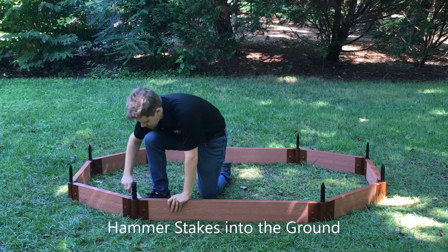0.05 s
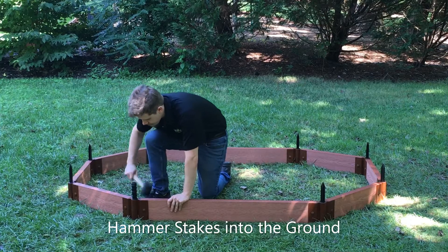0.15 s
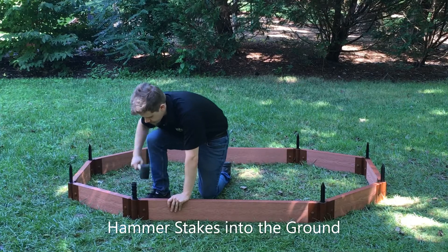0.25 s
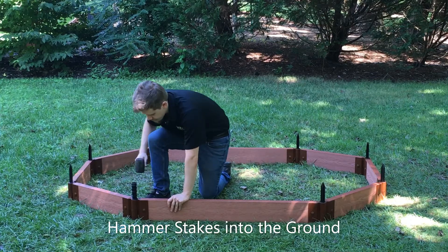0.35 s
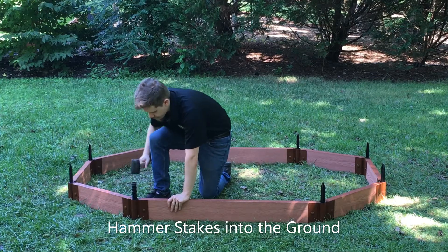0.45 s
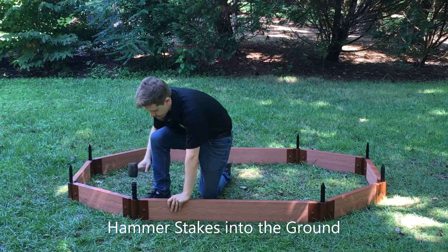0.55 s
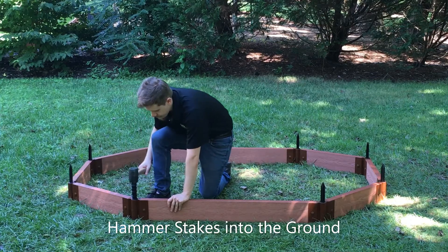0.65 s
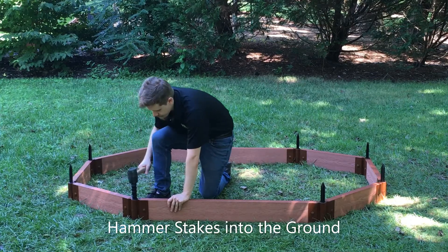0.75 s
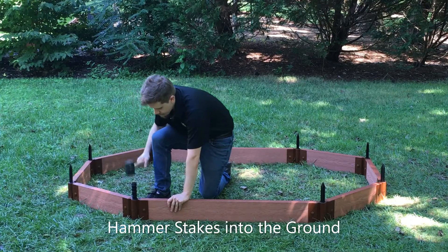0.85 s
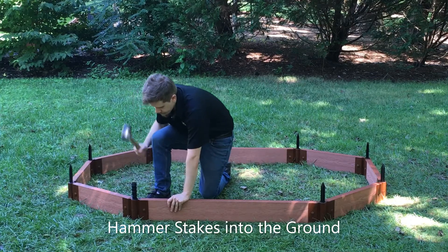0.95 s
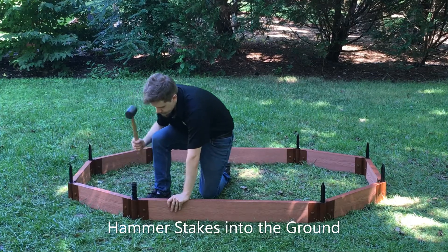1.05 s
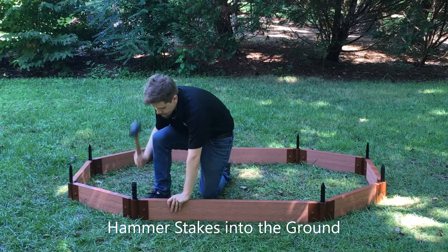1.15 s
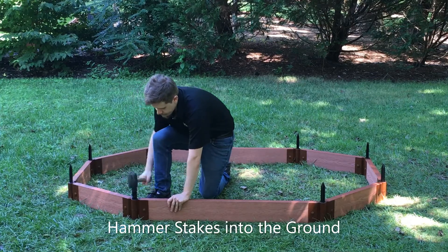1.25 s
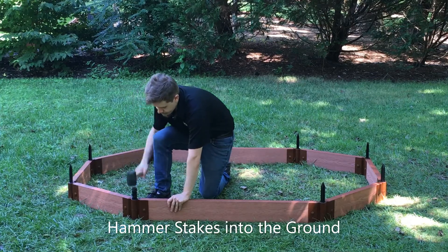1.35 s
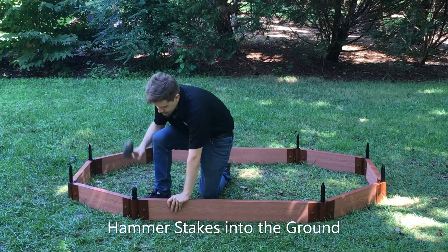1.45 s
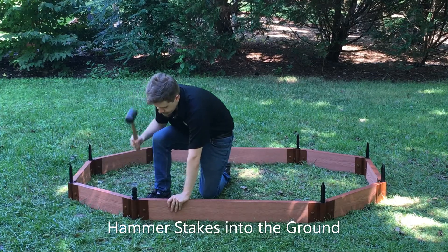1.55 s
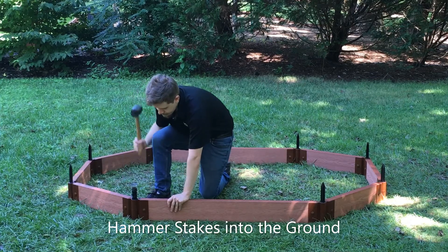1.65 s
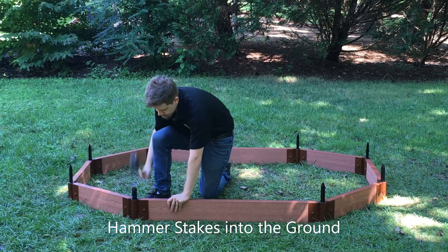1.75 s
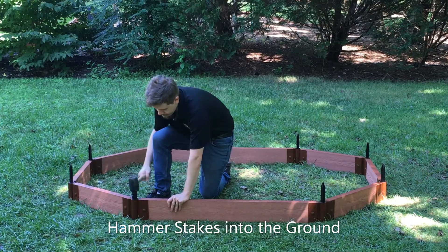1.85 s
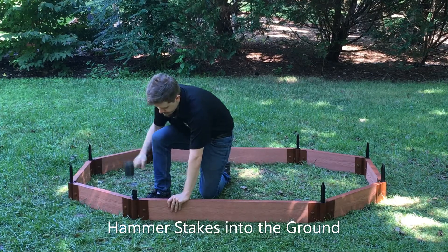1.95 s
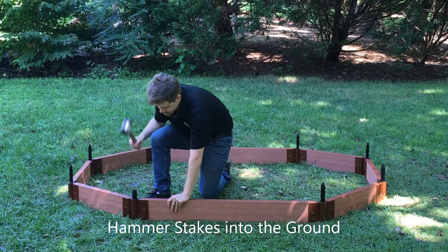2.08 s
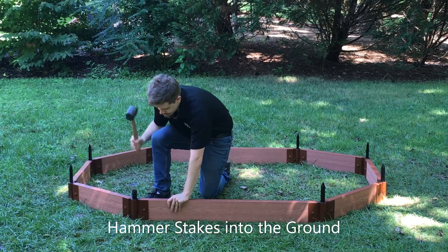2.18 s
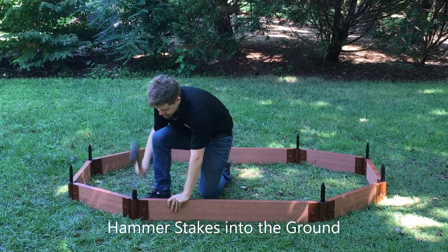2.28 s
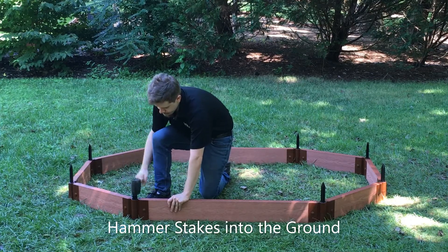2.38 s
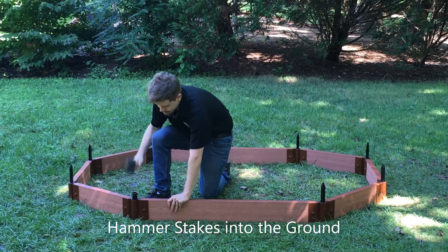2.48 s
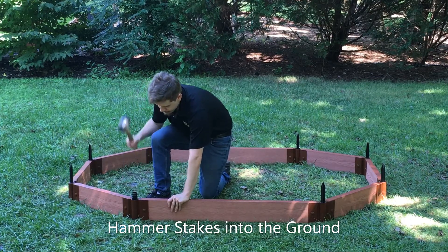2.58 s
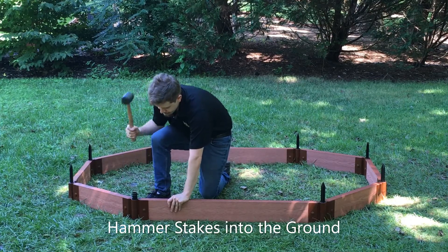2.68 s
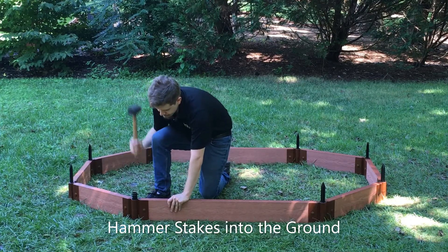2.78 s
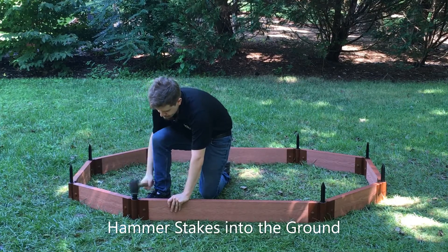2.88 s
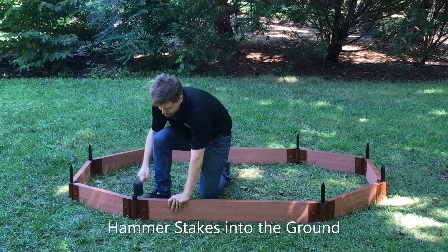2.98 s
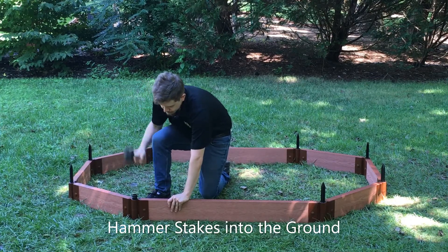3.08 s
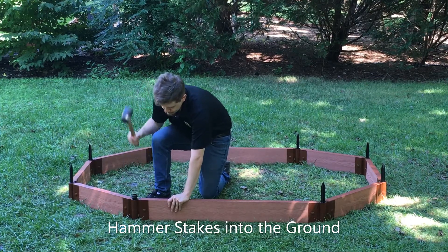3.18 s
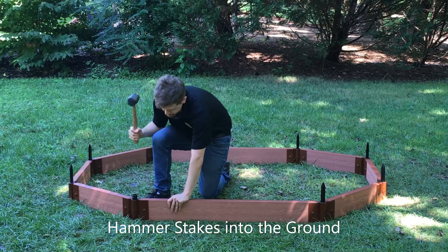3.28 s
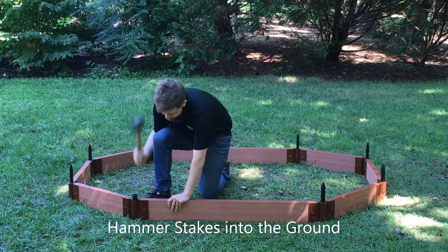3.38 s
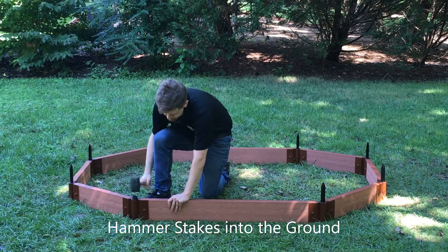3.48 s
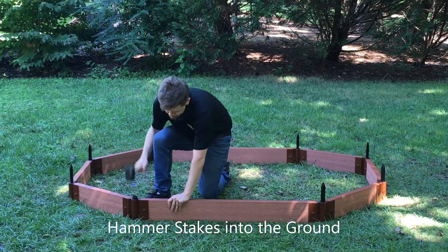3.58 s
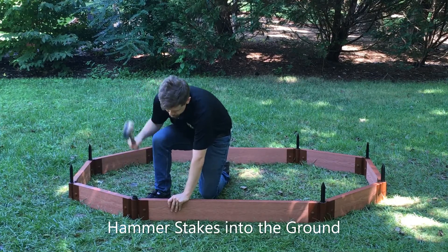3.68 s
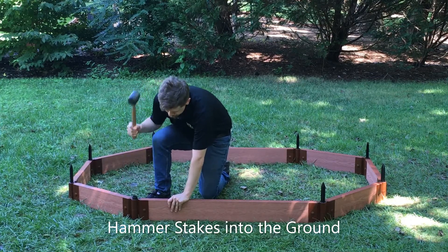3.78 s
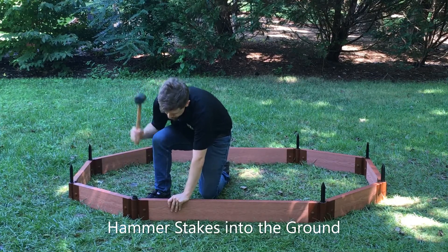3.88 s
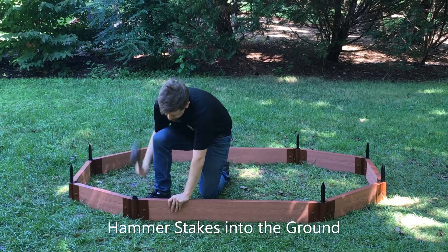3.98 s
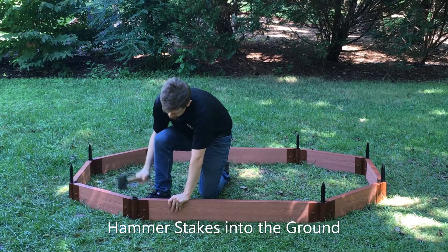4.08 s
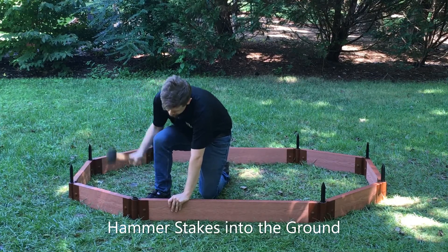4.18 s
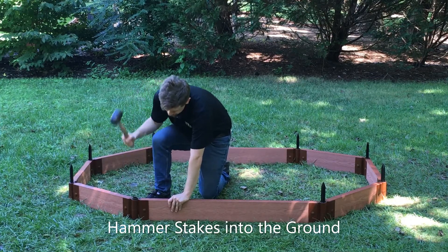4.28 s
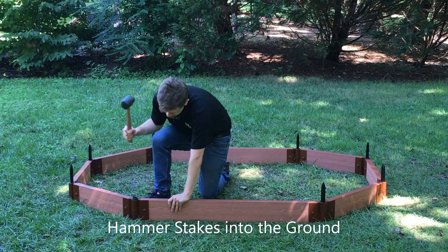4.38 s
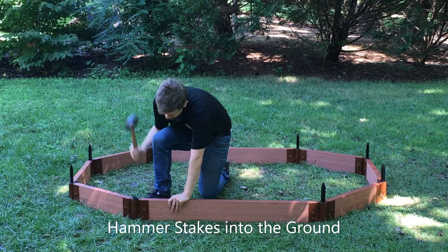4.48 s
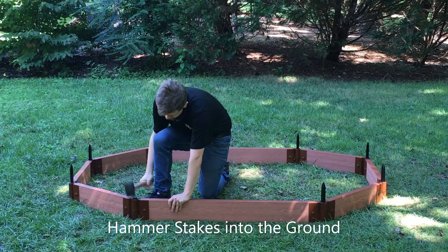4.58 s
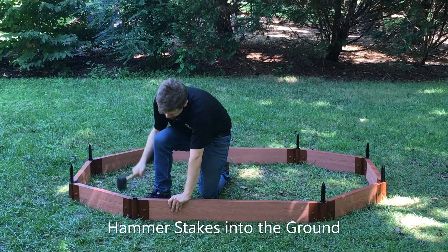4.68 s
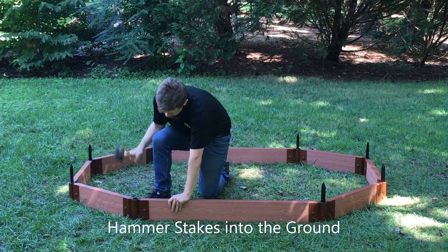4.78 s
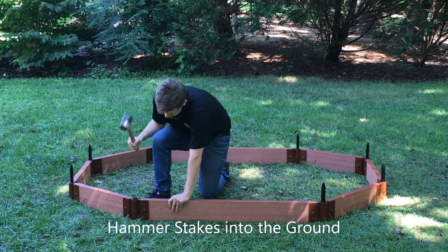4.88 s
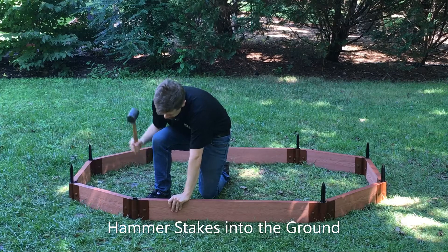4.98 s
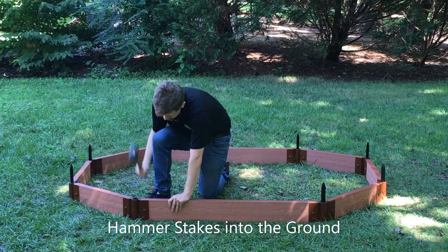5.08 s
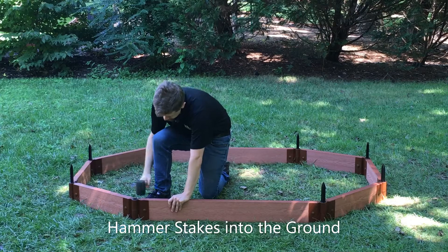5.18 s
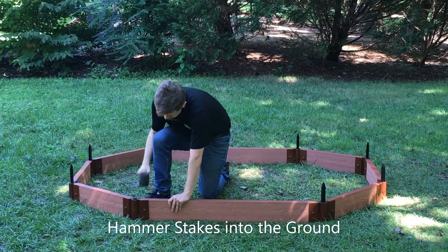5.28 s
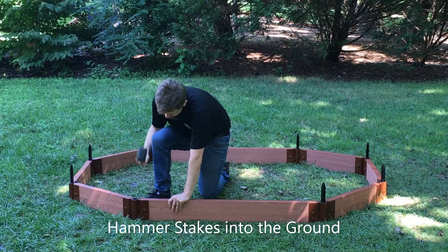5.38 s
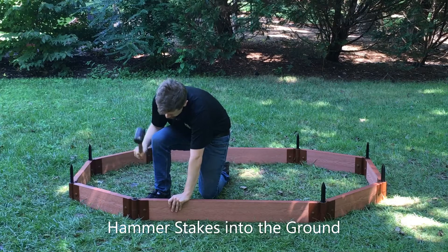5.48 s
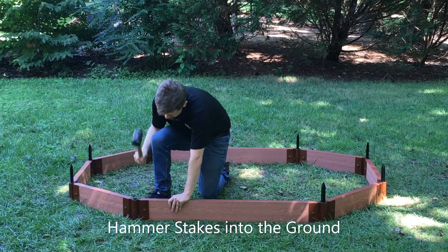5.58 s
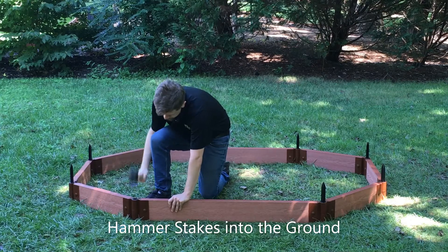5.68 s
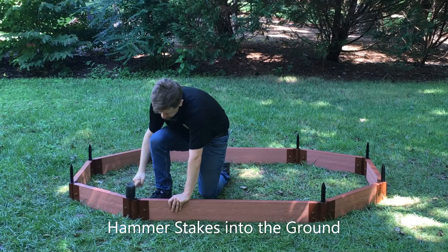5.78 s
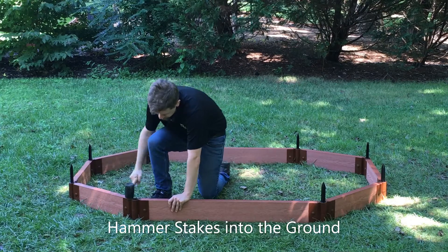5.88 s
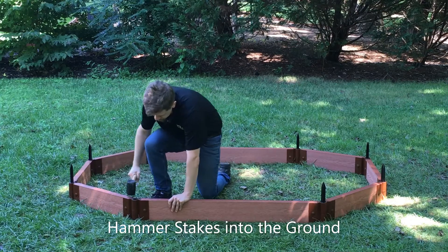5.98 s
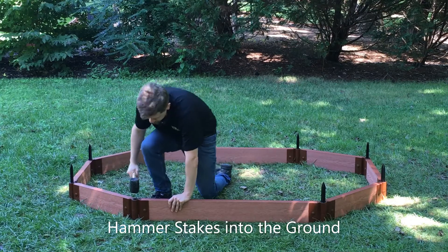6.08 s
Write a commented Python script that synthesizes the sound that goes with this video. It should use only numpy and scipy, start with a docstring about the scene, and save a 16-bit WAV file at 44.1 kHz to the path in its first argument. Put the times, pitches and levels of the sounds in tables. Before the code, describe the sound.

Near silence outdoors with a faint low rumble and thin insect buzz, then a barely audible dull tap. Strong mallet blows follow at a steady pace, some bright and rattly, others duller, hollow and thuddy, all short and dry with a quick leafy echo. The mallet head occasionally bounces lightly on the stake. Tiny ticks and rustles sit between hits, heard by a phone microphone a few metres away.

```python
"""On a lawn, with a phone a few metres off, a mallet drives a plastic stake through the corner of a low board frame.
A rough push rings the boards as decaying sines; the stake chatters in its sleeve as jagged noise and the soil thuds.
Now and then the head drops back on the stake. Shrubs return each blow as fading noise.
Behind lie faint rustles and ticks, an insect band, far traffic and wind, all shaped noise.
The loudest blows overload the phone's microphone."""
import sys
import numpy as np
from scipy import signal
from scipy.fft import rfft, irfft
from scipy.io import wavfile
from scipy.ndimage import uniform_filter1d

SR = 44100
rng = np.random.default_rng(int(sys.argv[2]) if len(sys.argv) > 2 else 0)


def unload_wav(signal):
    """Save mono or channel-first audio to the path in sys.argv[1] as 16-bit WAV at rate SR, clipped to [-1, 1]."""
    wavfile.write(
        sys.argv[1],
        SR,
        np.round(np.clip(np.atleast_2d(signal).T, -1, 1) * 32767).astype(np.int16),
    )


N = 270685
T = np.arange(N) / SR

# mallet on stake; knock rms over its first 10 ms, chatter, thud and hollow relative to the knock:
# (time [s], knock [dB], chatter [dB], thud [dB], hollow ring [dB], change of upper modes [dB], slide [ms])
BLOWS = [(0.7094, -50.5, -24.5, 1, -3, -24, 20), (1.3009, -26, -1.5, -20.5, -4, -10, 6.55),
         (1.8622, -22.5, 3.5, -15, -10, 2.5, 4.6), (2.409, -24.5, 3.5, -9.5, -3, -1, 4.7),
         (2.969, -29, 1, -5, -8, 6.5, 3.9), (3.545, -31, -8, -1, 2, 0, 4.84),
         (4.1138, -26, -4, -5, -20.5, 3, 3.1), (4.668, -32, -4.5, 2, 5, -0.5, 10.4),
         (5.224, -25, -5.5, -5.5, -12.5, -1.5, 5.9), (5.8065, -22.5, 1.5, -10.5, -13, 3.5, 5.6)]
# the head drops back on the stake: (time [s], knock level [dB])
REBOUNDS = [(0.766, -62.5), (2.473, -55), (5.885, -43.5)]
# modes of boards and stake, before each blow's own shifts: (frequency [Hz], level [dB], t60 [s])
FRAME_MODES = [(232, -10.5, 0.033), (347, -10, 0.052), (422, -11.5, 0.065), (490.4, -11, 0.081),
               (613, 0, .035), (773, -14, 0.042), (904, 2.5, 0.019), (1001, -13, .06), (1072, -18.5, 0.088),
               (1320, -19, 0.087), (1484, -10.5, 0.018), (1496, -21.5, 0.033), (1574, -14, .05),
               (1763, -21.5, .06), (2220, -19.5, 0.035), (2320, -21, 0.028), (2430, -14.5, .03),
               (2884, -17.5, 0.044)]
# spectrum of the stake in its sleeve, before each blow's tilt: (frequency [Hz], density [dB per Hz])
CHATTER_SPECTRUM = [(710, -31.5), (1200, -4), (1870, -4.5), (2830, -3.5), (5530, -6.5), (6510, -8),
                    (8910, -11), (14500, -17.5), (16000, -34.5)]
# return from near foliage, then from far, before the blow's own echo and chatter levels:
# (frequency [Hz], near level [dB], near t60 [s], far level [dB], far t60 [s])
SHRUB_BANDS = [(287, -25, 0.2, -43, 0.41), (550, -21.5, 0.18, -38, 0.41), (950, -18.5, 0.18, -35.5, 0.33),
               (1440, -20, 0.075, -38, 0.3), (2110, -22, 0.05, -38.5, 0.44), (3360, -19.5, .07, -34, 0.4),
               (5060, -17, 0.056, -35, 0.37), (7500, -23, 0.084, -36, 0.15), (10800, -26, .08, -47, 0.31),
               (13300, -30.5, .08, -48.5, .2)]
# soft rustles of sleeve and grass: (centre time [s], length [s], level [dB], frequency [Hz])
RUSTLES = [(.13, 0.069, -88, 6040), (1.02, 0.19, -83.5, 4300), (5.1, 0.29, -87.5, 4400)]
# faint ticks: (time [s], level [dB])
TICKS = [(1.67, -79), (2.2194, -73), (2.6308, -70), (3.9094, -82), (6.11, -85.5)]
# spectrum of far traffic and wind: (frequency [Hz], density [dB per Hz])
GARDEN_SPECTRUM = [(15, -9), (30, 2.5), (116, -4.5), (150, -8), (250, -13), (330, -17.5), (700, -21.5),
                   (1800, -28), (2600, -36), (4000, -35), (6500, -40), (9000, -42), (13500, -47),
                   (15500, -61.5)]

REBOUND_CHATTER_DB, REBOUND_THUD_DB, REBOUND_HOLLOW_DB = -23, -12, -14.5
REBOUND_UPPER_DB, REBOUND_SLIDE_MS, REBOUND_LOW_DB = -10, 11, 7
# as the stake sinks the modes below LOW_HZ grow and the thud follows sooner
LOW_HZ, LOW_DB, LOW_DB_PER_S = 450, -4.5, 1.56
UPPER_HZ = 800
THUD_HZ, THUD_T60_S, THUD_LAG_MS, THUD_LAG_MS_PER_S = 118, 0.048, 11, -1.1
# the longest ring of the hollow boards beats with a weaker neighbour
HOLLOW_HZ, HOLLOW_T60_S, TWIN_HZ, TWIN_DB = 677, 0.165, 651, -12.5
# soft or glancing blows slide longer: per doubling of the slide the chatter dulls and more goes to the shrubs
SHORT_SLIDE_MS = 5  # up to here nothing is added
TILT_DB, LONG_SLIDE_TILT_DB = -0.42, -1.9  # tilt is per octave around TILT_HZ
TILT_HZ = 3000
ECHO_DB, LONG_SLIDE_ECHO_DB = -1.44, 3
# insect band: fixed pitch and width; mean level and throb rate, which wander
INSECT_HZ, INSECT_WIDTH_HZ, INSECT_DB, INSECT_THROB_HZ = 7784, 360, -86.5, 62
GARDEN_DB = -67.5  # rms before the gusts
OVERLOAD = 0.16  # amplitude ceiling
TOP_HZ = 16200


def undb(db):
    """Decibels to gain."""
    return 10 ** (np.asarray(db) / 20)


def unit(x):
    """Scale to rms 1."""
    return x / np.sqrt(np.mean(x ** 2))


def colour(x, points):
    """Filter by (Hz, dB) points, joined on a logarithmic frequency scale."""
    hz, db = np.transpose(points)
    f = np.fft.rfftfreq(len(x), 1 / SR) + 1  # 1 Hz up, to avoid log(0)
    gain = undb(np.interp(np.log(f), np.log(hz), db))
    return irfft(rfft(x) * gain, len(x))


def band(x, hz, width_hz):
    """Band-pass with two pole pairs."""
    edges = np.clip([hz - width_hz / 2, hz + width_hz / 2], 10, 0.45 * SR)
    return signal.sosfilt(signal.butter(2, edges, "band", fs=SR, output="sos"), x)


def fade(t, t60):
    """Exponential decay, 60 dB down at t60."""
    return np.exp(-np.log(1000) * t / t60)


def walk(rate):
    """Smooth random wander of rms 1, with `rate` new values a second."""
    k = int(SR / rate)
    steps = np.repeat(rng.standard_normal(N // k + 1), k)
    smooth = uniform_filter1d(uniform_filter1d(steps, k), k)
    return unit(smooth[:N])


def add(out, s, x):
    """Mix x in at s seconds."""
    i = int(s * SR)
    out[i:i + len(x)] += x[:N - i]


def blow(s, knock_db, chatter_db, thud_db, hollow_db, upper_db, slide_ms, extra_low_db=0):
    """One mallet blow: boards, hollow ring, chatter and thud, with the echo from the shrubs."""
    t = T[:SR // 2]
    doublings = max(np.log2(slide_ms / SHORT_SLIDE_MS), 0)
    tilt_db = TILT_DB + LONG_SLIDE_TILT_DB * doublings
    echo_db = ECHO_DB + LONG_SLIDE_ECHO_DB * doublings
    low_db = LOW_DB + LOW_DB_PER_S * s + extra_low_db
    grip = stake_slide(t, slide_ms / 1000)
    direct = board_knock(t, grip, low_db, upper_db)
    direct += undb(hollow_db) * hollow_ring(t)
    direct += undb(chatter_db) * sleeve_chatter(t, grip, tilt_db)
    direct += undb(thud_db) * soil_thud(t, s)
    return undb(knock_db) * (direct + undb(echo_db) * shrubs(t, chatter_db, tilt_db))


def stake_slide(t, slide):
    """Rubbing strength: it rises at once, sinks as the stake slows, then dies as it settles."""
    rise = np.clip(t / 0.00093, 0, 1)
    settle = np.where(t < slide, 1, fade(t - slide, 0.015))
    return rise * settle * fade(t / slide, 14)


def board_knock(t, grip, low_db, upper_db):
    """A jolt, then stick and slip while the stake moves, rings the modes of boards and stake."""
    jolt = np.sin(np.pi * np.clip(t / 0.00045, 0, 1))
    force = jolt + 0.64 * grip * rng.standard_normal(len(t))
    ring = np.zeros(len(t))
    for k, (hz, db, t60) in enumerate(FRAME_MODES):
        # every blow shifts each mode a little in level and pitch
        level_db = db + low_db * (hz < LOW_HZ) + upper_db * (hz > UPPER_HZ) + 2 * rng.standard_normal()
        pitch = hz * (1 + 0.018 * rng.standard_normal())
        sign = (-1) ** (k + 1)
        ring += sign * undb(level_db) * np.sin(2 * np.pi * pitch * t) * fade(t, t60)
    knock = signal.fftconvolve(force[:SR // 20], ring)[:len(t)]
    # the boards take a moment to follow the stake
    knock *= np.clip(0.12 + t / 0.0024, 0, 1)
    return knock / np.sqrt(np.mean(knock[:SR // 100] ** 2))


def hollow_ring(t):
    """Two close tones of the hollow boards swell in, beat and decay together."""
    main = np.sin(2 * np.pi * HOLLOW_HZ * t)
    twin = undb(TWIN_DB) * np.sin(2 * np.pi * (TWIN_HZ * t + rng.random()))
    return -(main + twin) * fade(t, HOLLOW_T60_S) * np.clip(t / 0.0068, 0, 1)


def sleeve_chatter(t, grip, tilt_db):
    """The stake rubs through its sleeve in uneven slips, a moment after the head lands."""
    slips = undb(7.5 * uniform_filter1d(rng.standard_normal(len(t)), size=24) * np.sqrt(24))
    shade = [(hz, db + tilt_db * np.log2(hz / TILT_HZ)) for hz, db in CHATTER_SPECTRUM]
    rub = unit(colour(rng.standard_normal(len(t)), shade))
    return rub * slips * np.roll(grip, int(0.00079 * SR))


def soil_thud(t, s):
    """The soil answers late with a low decaying tone, sooner for later blows."""
    lag = max(THUD_LAG_MS + THUD_LAG_MS_PER_S * s, 0) / 1000
    late = np.clip(t - lag, 0, 1)
    return np.sin(2 * np.pi * THUD_HZ * late) * fade(late, THUD_T60_S)


def shrubs(t, chatter_db, tilt_db):
    """Leaves and trunks scatter the blow into noise bands; the chatter level sets those above 1600 Hz."""
    out = np.zeros(len(t))
    for hz, near_db, near_t60, far_db, far_t60 in SHRUB_BANDS:
        fed_db = (chatter_db + tilt_db * np.log2(hz / TILT_HZ)) * (hz > 1600)
        near = undb(near_db) * fade(t, near_t60) * np.clip(t / 0.004, 0, 1)
        far = undb(far_db) * fade(t, far_t60) * np.clip(t / 0.025, 0, 1)
        scatter = unit(band(rng.standard_normal(len(t)), hz, min(0.6 * hz, 3500)))
        out += undb(fed_db) * (near + far) * scatter
    # gaps in the foliage make the echo lumpy
    return out * undb(1.6 * walk(65)[:len(t)])


def stirrings():
    """Rustles are noise bands that swell and fade; ticks are single short grains of noise."""
    out = np.zeros(N)
    for s, length, db, hz in RUSTLES:
        rustle = unit(band(rng.standard_normal(N), hz, 0.51 * hz))
        out += undb(db) * rustle * np.exp(-2 * (2 * (T - s) / length) ** 2)
    for s, db in TICKS:
        grain = unit(band(rng.standard_normal(900), 7000, 9000))
        add(out, s, undb(db) * grain * fade(T[:900], 0.012))
    return out


def insects():
    """A chorus on one high noise band, throbbing with the wing strokes."""
    phase = 2 * np.pi * np.cumsum(INSECT_THROB_HZ * (1 + 0.064 * walk(15))) / SR
    song = unit(band(rng.standard_normal(N), INSECT_HZ, INSECT_WIDTH_HZ))
    return undb(INSECT_DB + 0.83 * walk(3.2)) * song * (1 + 0.5 * np.sin(phase))


def garden():
    """Far traffic and wind as shaped noise: the bass gusts, the rest stays smoother."""
    air = unit(colour(rng.standard_normal(N), GARDEN_SPECTRUM))
    bass = signal.sosfilt(signal.butter(2, 250, fs=SR, output="sos"), air)
    gusts = undb(2.2 * walk(9.2) + 0.81 * walk(1.0))
    drift = undb(1.1 * walk(1.1))
    return undb(GARDEN_DB) * (bass * gusts + (air - bass) * drift)


def scene():
    """The blows and rebounds with their echoes over the garden."""
    out = stirrings() + insects() + garden()
    for row in BLOWS:
        add(out, row[0], blow(*row))
    for s, db in REBOUNDS:
        add(out, s, blow(s, db, REBOUND_CHATTER_DB, REBOUND_THUD_DB, REBOUND_HOLLOW_DB, REBOUND_UPPER_DB,
                         REBOUND_SLIDE_MS, REBOUND_LOW_DB))
    return out[None]


def record(dry):
    """The phone's microphone flattens the loudest peaks, dulls the highest treble and cuts the top."""
    flat = dry / (1 + np.abs(dry / OVERLOAD) ** 6) ** (1 / 6)
    dull = signal.sosfilt(signal.butter(4, 15000, fs=SR, output="sos"), flat)
    return signal.sosfilt(signal.ellip(10, 0.2, 80, TOP_HZ, fs=SR, output="sos"), dull)


dry = scene()
out = record(dry)
unload_wav(out)
```